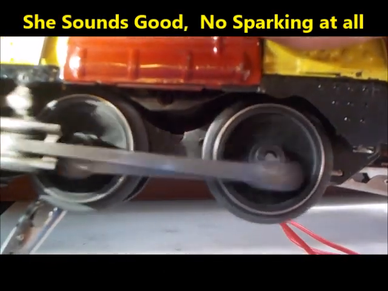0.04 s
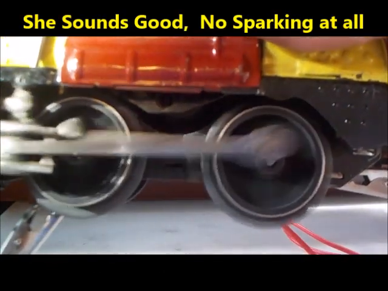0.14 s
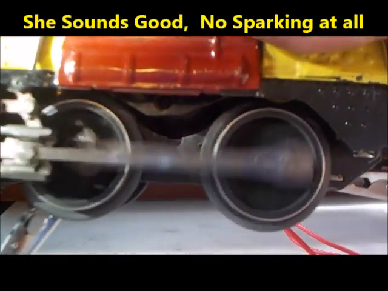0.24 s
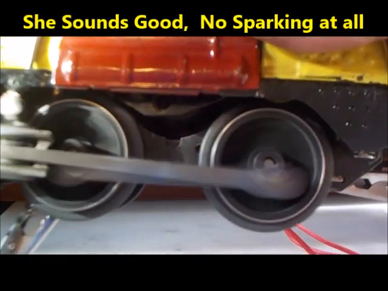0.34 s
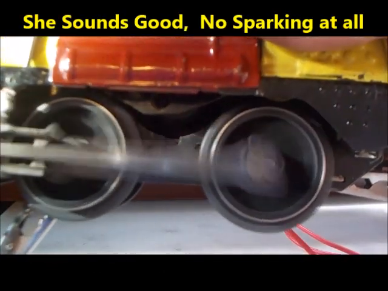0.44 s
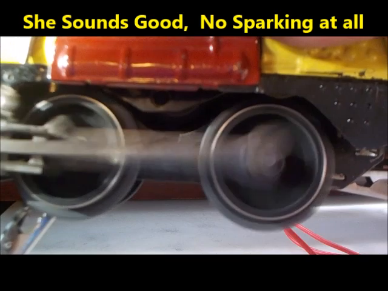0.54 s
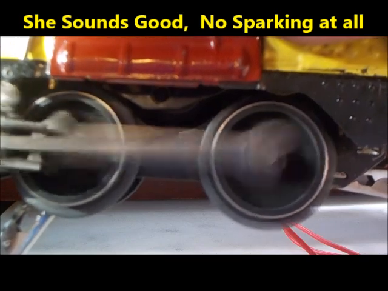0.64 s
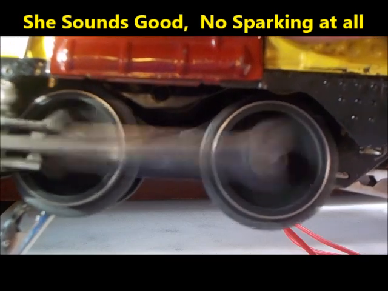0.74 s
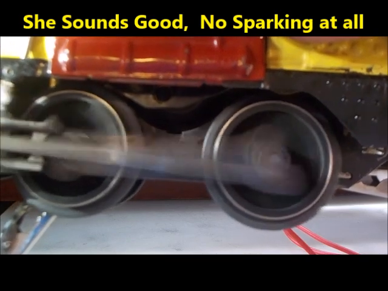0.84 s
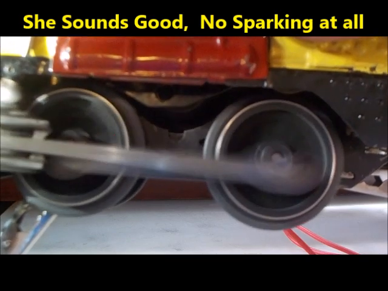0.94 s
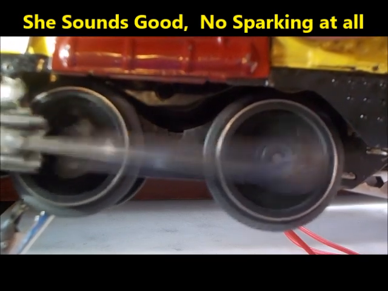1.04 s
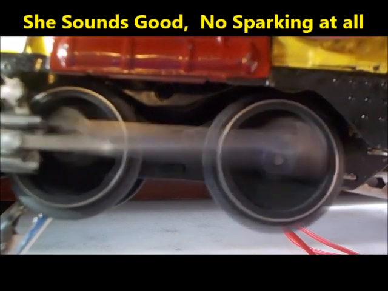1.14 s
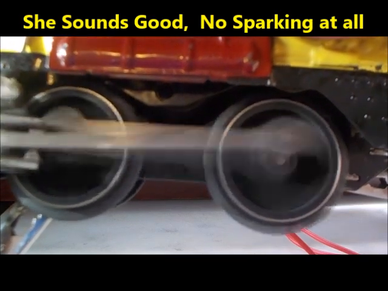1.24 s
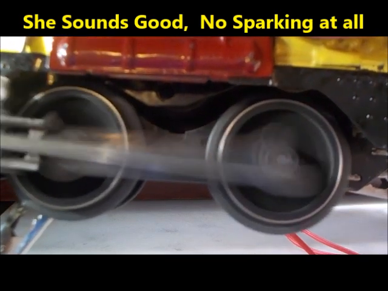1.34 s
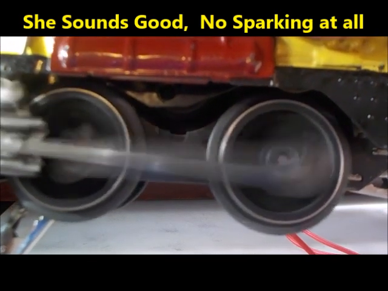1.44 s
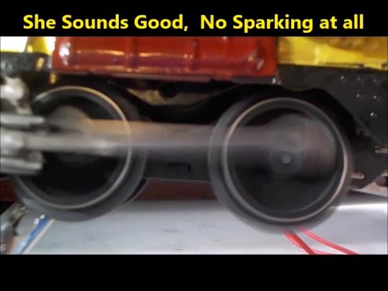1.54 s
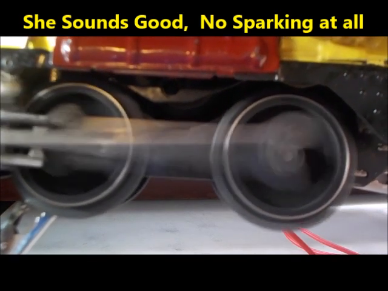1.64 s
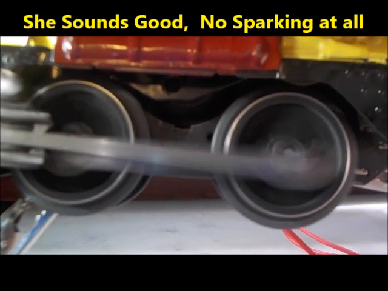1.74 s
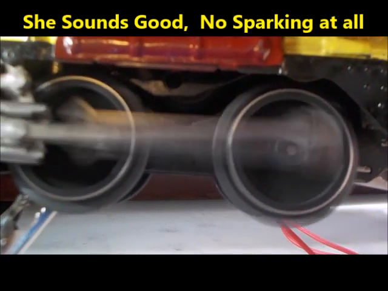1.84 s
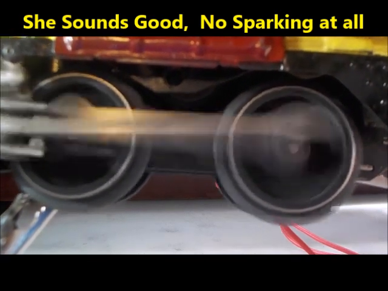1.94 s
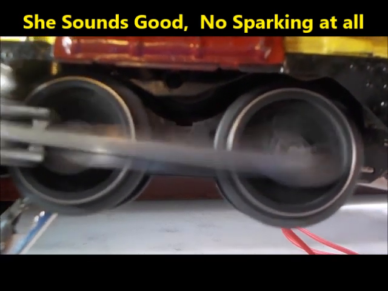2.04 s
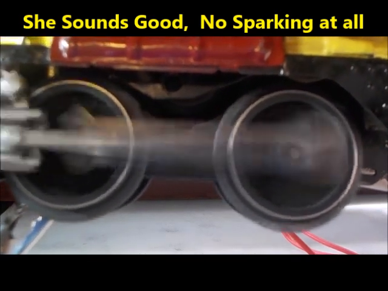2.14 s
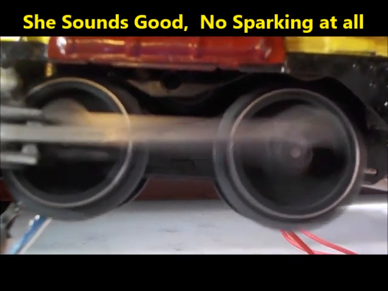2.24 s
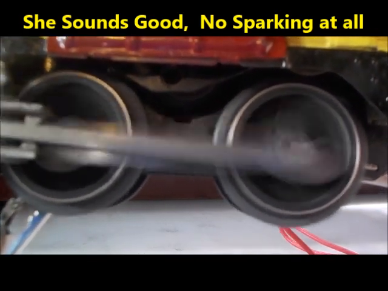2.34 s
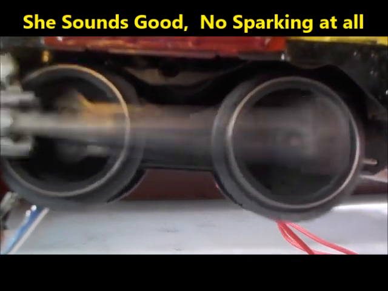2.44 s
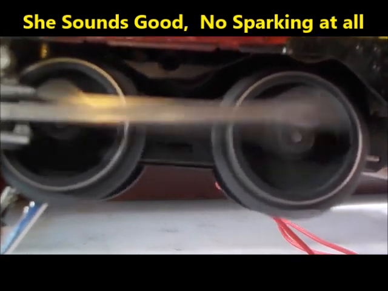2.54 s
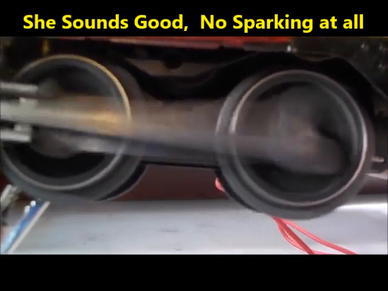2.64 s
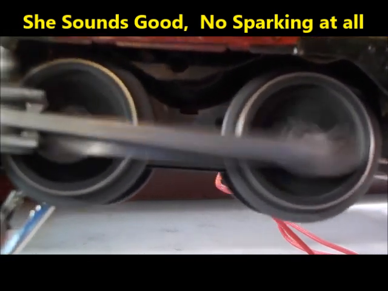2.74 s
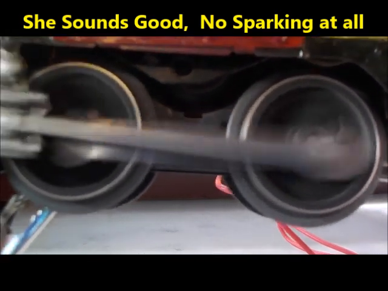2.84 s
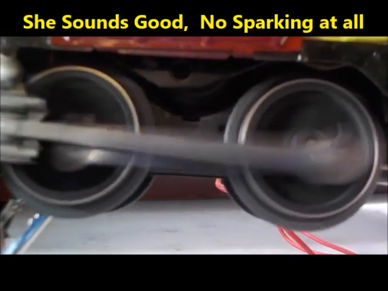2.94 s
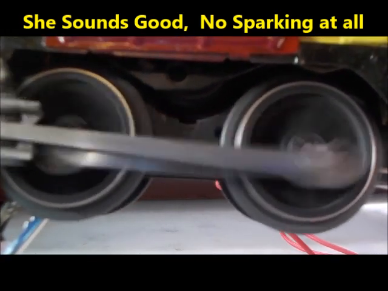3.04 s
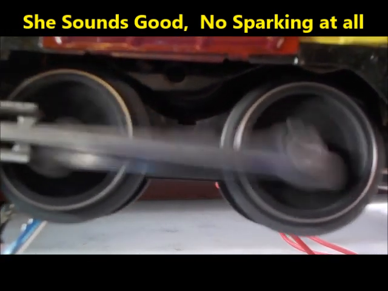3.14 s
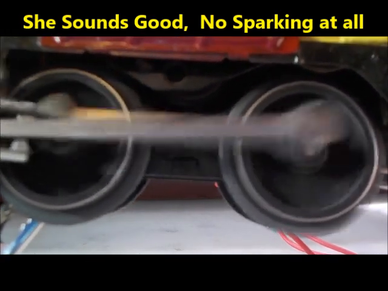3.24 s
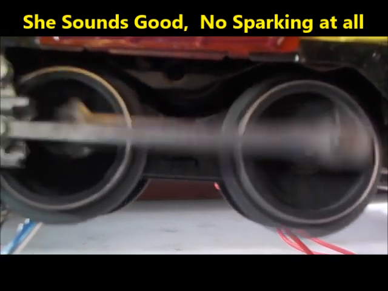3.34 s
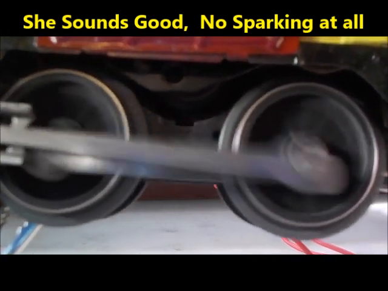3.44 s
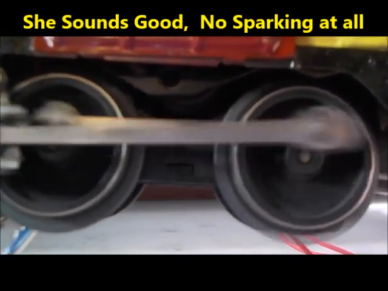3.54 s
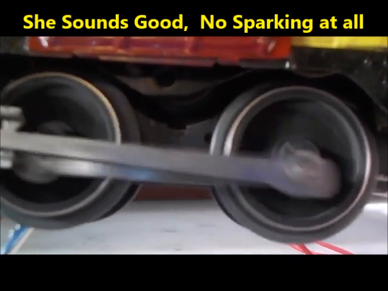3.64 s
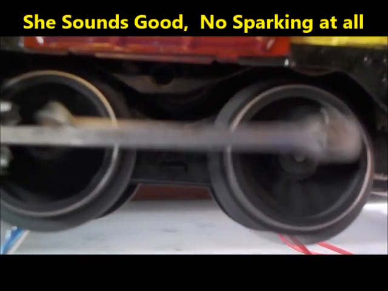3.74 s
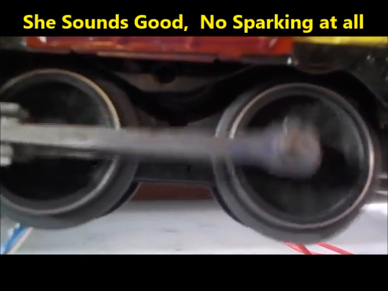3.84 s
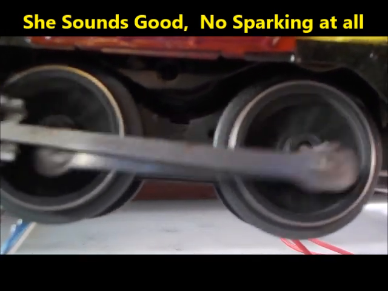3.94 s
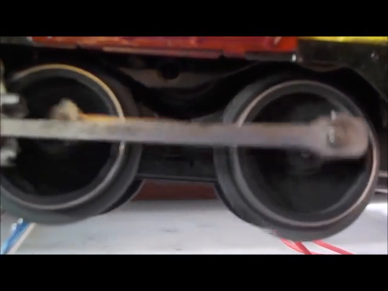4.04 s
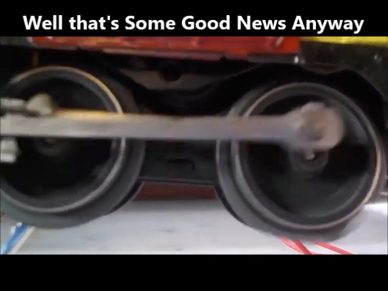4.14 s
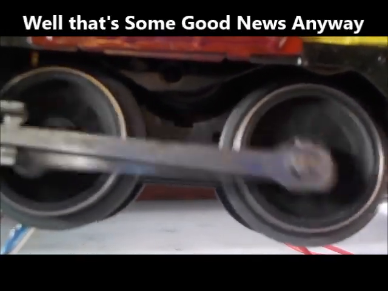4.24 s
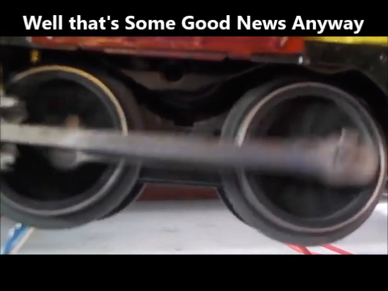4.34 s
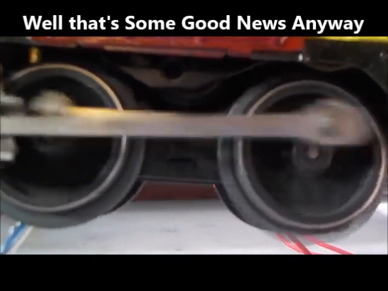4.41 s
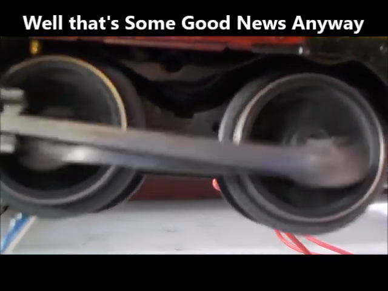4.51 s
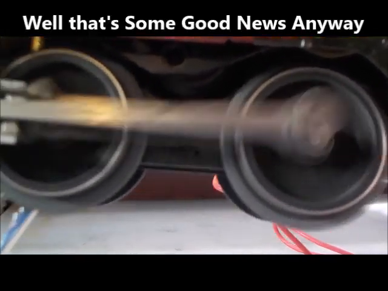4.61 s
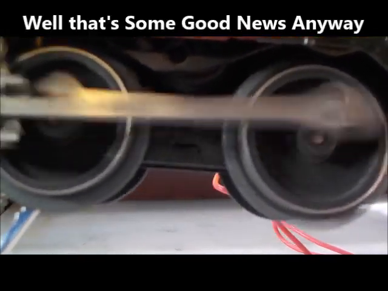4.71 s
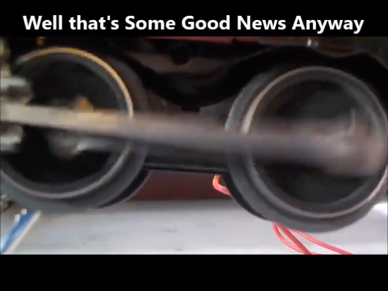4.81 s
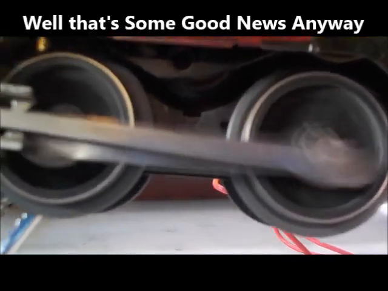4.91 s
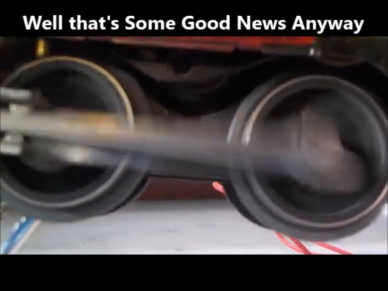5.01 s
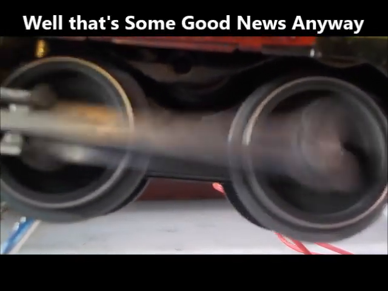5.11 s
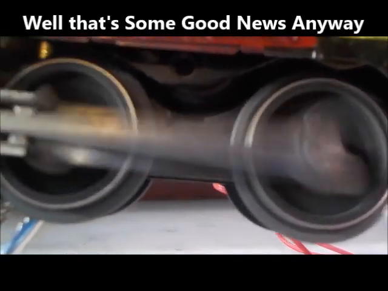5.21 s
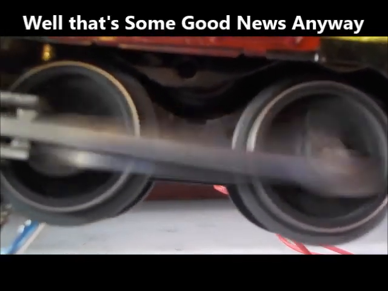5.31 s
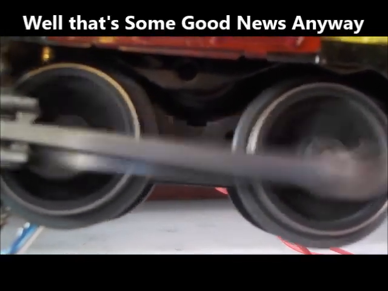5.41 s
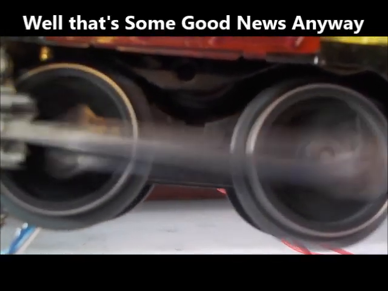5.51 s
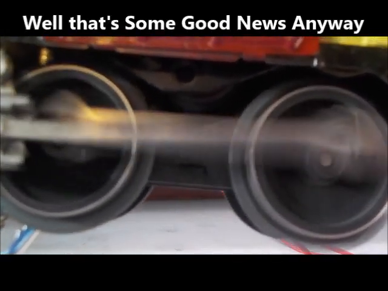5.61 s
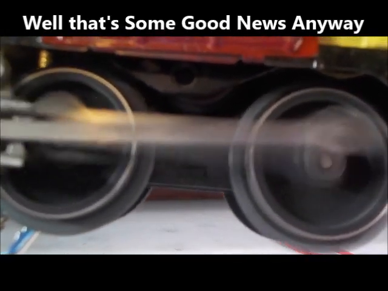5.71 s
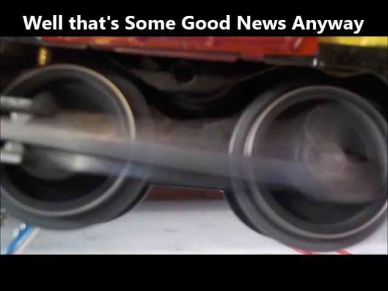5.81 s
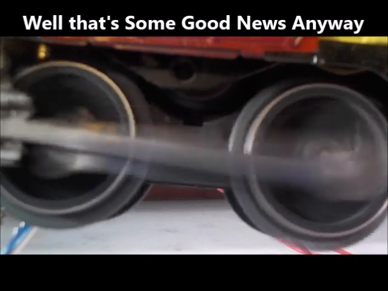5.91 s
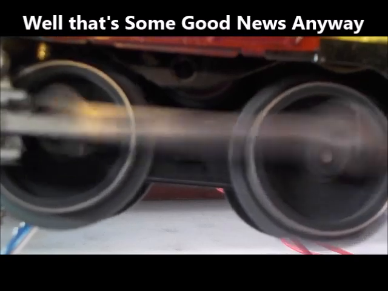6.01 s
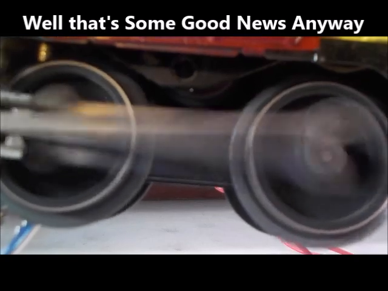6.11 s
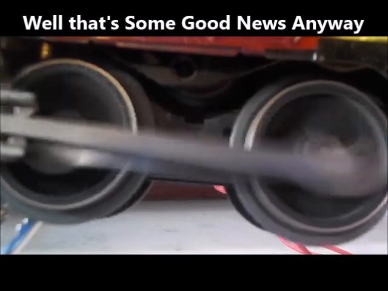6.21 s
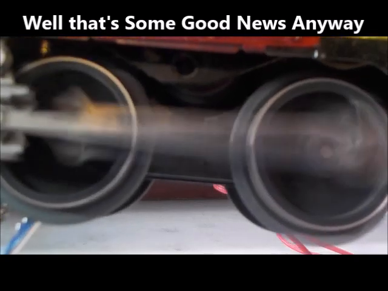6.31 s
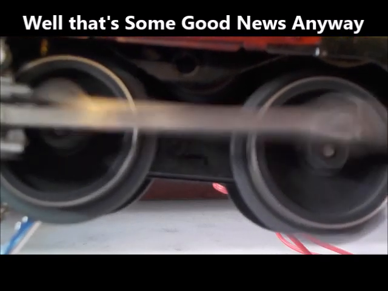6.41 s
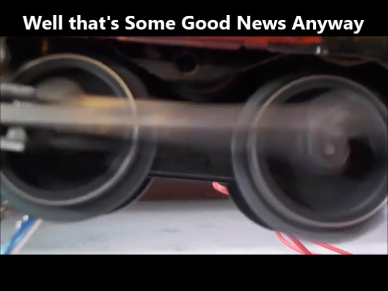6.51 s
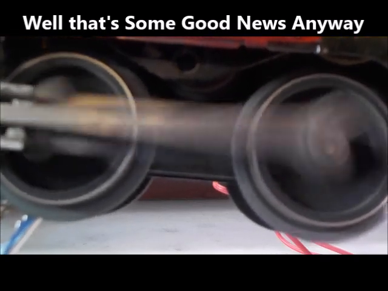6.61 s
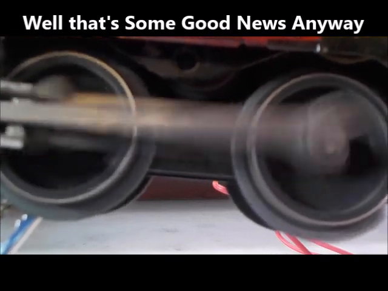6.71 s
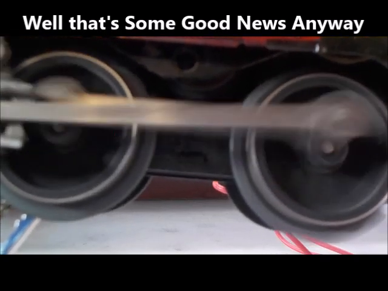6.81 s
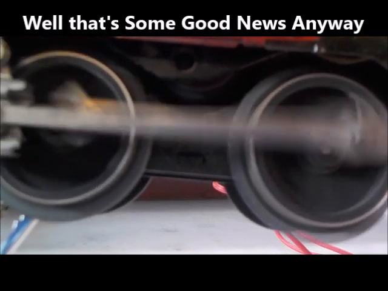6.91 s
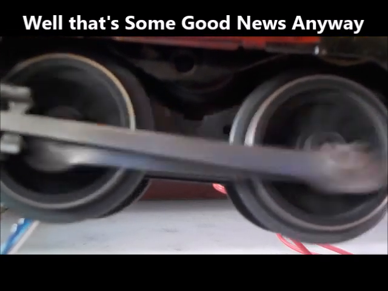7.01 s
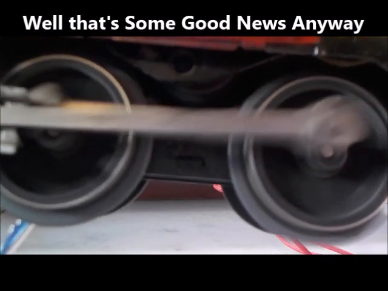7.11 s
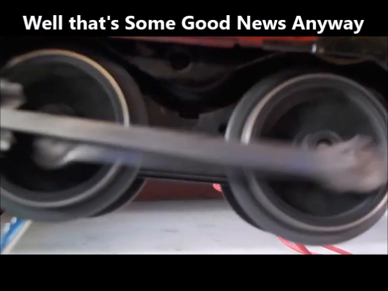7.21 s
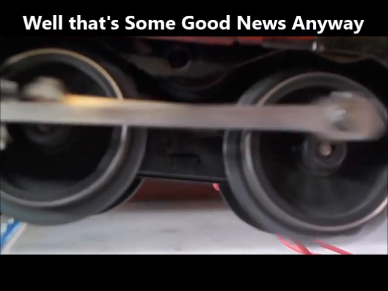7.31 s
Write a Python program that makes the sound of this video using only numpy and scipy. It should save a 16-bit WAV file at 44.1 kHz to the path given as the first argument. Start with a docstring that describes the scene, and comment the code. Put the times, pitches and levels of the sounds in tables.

```python
"""On a workbench, a small electric model locomotive spins its wheels freely, speeding up and easing
off twice. Loose gears chatter in the metal frame and the shell, swelling once per wheel turn as the
coupling rods (the bars linking the wheels) come round. The motor hums faintly underneath, and its small
gear, the pinion, ticks at a crawl. The rods clack at fixed places in each turn and knock near full
speed, and now and then the gears snap over hard."""
import sys
import numpy as np
from scipy import signal
from scipy.fft import rfft, irfft, next_fast_len
from scipy.io import wavfile
from scipy.ndimage import uniform_filter1d

SR = 44100
rng = np.random.default_rng(int(sys.argv[2]) if len(sys.argv) > 2 else 0)


def transcribe(u):
    """Save the signal u as a 16-bit wav file named by the first command-line argument.

    u: samples, shape (n,) or (channels, n), limited to [-1, 1]; the rate is SR.
    q: integer samples, one column per channel.
    """
    v = np.clip(np.atleast_2d(u).T, -1, 1)
    q = np.round(v * 32767).astype(np.int16)
    wavfile.write(sys.argv[1], SR, q)


N = 324568
TIME = np.arange(N) / SR
GEAR_RATIO = 8.53  # motor shaft turns per wheel turn


def from_db(db):
    """Turn decibels into a number to multiply by."""
    return 10 ** (np.asarray(db) / 20)

def at_hz(tone, hz):
    """Read a table of levels at any pitch, on a log-frequency axis."""
    pitch_hz, level_db = np.transpose(tone)
    return np.interp(np.log(np.maximum(hz, 1)), np.log(pitch_hz), level_db)

def response(tone, size=8192):
    """How a body rings after one tap (minimum phase). The table sets its tone, not its loudness."""
    cepstrum = irfft(np.log(from_db(at_hz(tone, np.fft.rfftfreq(size, 1 / SR)))))
    cepstrum[1:size // 2] *= 2
    cepstrum[size // 2 + 1:] = 0
    ring = irfft(np.exp(rfft(cepstrum)))
    return ring / np.linalg.norm(ring)

def through(force, tone):
    """The sound of a force shaking a body."""
    return signal.oaconvolve(force, response(tone)[None], axes=1)[:, :N]

def resonate(force, hz, width_hz):
    """Ring at one pitch; a narrower width rings longer."""
    r = np.exp(-np.pi * width_hz / SR)
    return signal.lfilter([1, 0, -1], [1, -2 * r * np.cos(2 * np.pi * hz / SR), r * r], force)

def steady(x):
    """Even out the power to 1 over about a tenth of a second; the fast grain stays."""
    return x / np.sqrt(np.maximum(uniform_filter1d(x ** 2, 5000), 1e-12))

def scatter(shape):
    """Bell-curve random numbers, kept between -2 and 2."""
    return np.clip(rng.standard_normal(shape), -2, 2)

def wander(per_s):
    """A random curve that drifts about 1 either side of zero."""
    knots = rng.standard_normal(400)
    return np.interp(TIME * per_s, np.arange(len(knots)), knots)

def swell(turns, depth_db, peak_at):
    """The load rises and falls once per wheel turn, highest at the given part of the turn."""
    return from_db(depth_db * np.cos(2 * np.pi * (turns - peak_at)))

def passing(turns, part):
    """The times at which a wheel or shaft passes the given part of its turn."""
    return np.interp(np.arange(int(turns[-1])) + part, turns, TIME)

def blows(events, tone, rise_s, settle_s, size=1200):
    """Each blow (start_s, peak_db) is a brief buzz of rebounds that builds, dies and rings a body."""
    out, body = np.zeros((2, N + 2 * size)), response(tone)[None, :size]
    t = np.arange(size) / SR - .006
    envelope = np.exp(np.minimum(t / rise_s, -t / settle_s))
    for (s, peak_db), buzz in zip(events, rng.standard_normal((len(events), 2, size))):
        ring = signal.fftconvolve(buzz * envelope, body, axes=1)
        ring /= np.abs(ring).max(axis=1, keepdims=True)
        start = max(int((s + t[0] + .0008) * SR), 0)
        out[:, start:start + ring.shape[1]] += from_db(peak_db) * ring
    return out[:, :N]


# How fast the wheels spin: time_s, speed_turns_per_s
WHEEL_SPEED = [(0, 6.23), (.55, 8.62), (1, 11.79), (1.35, 12.6), (1.9, 13.2), (2.5, 13.39), (2.7, 12.14),
               (3.1, 8.5), (3.6, 4.57), (3.9, 3.08), (4.5, 6.45), (5.05, 9.41), (5.5, 11.64), (5.9, 12.79),
               (6.3, 13.03), (6.5, 11.35), (6.85, 8.07), (7.36, 3.81)]
def wheel_motion():
    """Wheel turns so far, speed, and how much the motor pulls or coasts (0 to 1 each)."""
    speed = np.interp(TIME, *np.transpose(WHEEL_SPEED))
    acceleration = uniform_filter1d(np.gradient(speed) * SR, size=10000)
    pull, coast = np.clip(acceleration / 4.5, 0, 1), np.clip(-acceleration / 8, 0, 1)
    return np.cumsum(speed) / SR, speed, pull, coast

def chatter_levels(turns, speed, pull, coast):
    """Base levels of frame and shell: they follow the speed a little late and flatten near the top."""
    lag_turns, press_lag_turns, rattle_turns_per_s = .22, .55, 6.94
    slack = 1 - np.interp(turns - lag_turns, turns, speed) / speed.max()
    # at low speed a pulling motor presses the teeth together and hushes the frame
    pressed = np.interp(turns - press_lag_turns, turns, pull) * np.maximum(rattle_turns_per_s - speed, 0)
    frame_db = -24.5 - 27.5 * slack ** 1.823 - 2.5 * pressed
    shell_db = -40.5 - 29 * slack ** 2.5 - 4 * coast * (1 - slack)  # coasting unloads the shell
    return frame_db, shell_db

def gear_force(shaft_turns, speed, settle_s=.0037):
    """Teeth land unevenly, each setting off tiny dying bounces. Two rows: near side and far side."""
    tooth = np.floor(shaft_turns * 3)
    lands = np.flatnonzero(np.diff(tooth))
    timing, strength = rng.standard_normal((len(lands), 2)).T
    late = (timing * .0006 * SR).astype(int)
    # the pinion runs slightly off centre, so one landing per shaft turn is harder
    hard = tooth[lands] % 3 == 0
    hits = np.zeros(N)
    hits[np.clip(lands + late, 0, N - 1)] = from_db(7.5 * np.clip(strength, -2, 1.3) + 3.5 * hard)
    sliding = 1.0
    pressure = sliding + signal.lfilter([1], [1, -np.exp(-1 / (settle_s * SR))], hits + 1e-18)
    bounces_per_s = 3500 + 450 * speed
    touches = rng.random((2, N)) < bounces_per_s / SR
    sizes = from_db(2.5 * scatter((2, N))) * rng.choice([-1, 1], (2, N))
    return pressure * touches * sizes

def free_flight(clacks, depth_db, gap_s):
    """Just before a clack the parts fly free, so the chatter drops for a moment."""
    free = np.zeros(N)
    for s, _ in clacks:
        near = slice(max(int((s - .03) * SR), 0), int((s + .02) * SR))
        free[near] += np.exp(-((TIME[near] - s) / gap_s + .7) ** 2)
    return from_db(-depth_db * np.minimum(free, 1))


# The dull tone of the chassis, the model's base: pitch_hz, level_db
CHASSIS_TONE = [(80, -55), (140, -27), (250, -14), (400, -2), (520, 1), (750, -7), (1100, -30)]
def chassis_mutter(force):
    """The gears shake the chassis into a faint, even mutter."""
    return from_db(-74) * steady(through(force, CHASSIS_TONE))


# The mid-range tone of the outer shell: pitch_hz, level_db
SHELL_TONE = [(70, -59), (150, -47), (210, -42.5), (300, -36), (450, -14), (640, -4.5), (900, 4),
              (1110, -1.5), (1350, 5), (1620, 0.5), (1820, -4), (2150, -5.5), (2400, -30.5), (3200, -72.5)]
# The narrow rings of the cover: pitch_hz, width_hz, level_db
COVER_RINGS = [(1206, 25, -3), (1469, 47, 10), (1615, 47, 1)]
def shell_chatter(force, turns, slowness, coast, shell_db):
    """The gears shake the shell, which rings the cover; both throb more when slow or coasting."""
    shaking = through(force, SHELL_TONE)
    shell = from_db(shell_db - 2) * steady(shaking)
    shell *= swell(turns, depth_db=.22 * slowness + 1.2 * coast, peak_at=.64)
    rings = sum(from_db(db) * resonate(shaking, hz, width) for hz, width, db in COVER_RINGS)
    cover = from_db(shell_db - 4.5 - 1.5 * slowness + 1.8 * coast) * steady(rings)
    cover *= swell(turns, depth_db=5.2 + .4 * slowness + 3 * coast, peak_at=.66)
    return shell + cover


# The bright tone of the metal frame: pitch_hz, level_db
FRAME_TONE = [(150, -57), (1410, -41.5), (2400, -48.5), (2710, -20.5), (3000, -24.5), (3360, 0), (3590, 2),
              (5140, -6.5), (5880, -5), (6510, -10.5), (7200, -26), (8000, -38), (10400, -61),
              (17600, -120)]
# The narrow rings of the frame: pitch_hz, width_hz, level_db
FRAME_RINGS = [(3504, 21, 2), (3750, 64, 2.5), (4380, 54, -3.5), (5680, 180, -9)]
def frame_chatter(force, turns, slowness, coast, frame_db):
    """The gears rattle the frame; its rings come and go as the contact points shift."""
    rings = sum(from_db(db + 4 * wander(per_s=20)) * steady(resonate(force, hz, width))
                for hz, width, db in FRAME_RINGS)
    # the small frame gives off only its middle range
    rings = signal.sosfilt(signal.butter(8, [3200, 6300], "band", fs=SR, output="sos"), rings)
    rattle = from_db(-1) * steady(through(force, FRAME_TONE))
    metal = rattle + from_db(-10.5 - .5 * slowness) * rings
    return from_db(frame_db) * metal * swell(turns, depth_db=1.06 + .5 * coast, peak_at=.52)


# The high sizzle of metal touching metal: pitch_hz, level_db
SIZZLE_TONE = [(800, -81), (7000, -24.5), (8000, -21), (8450, 4), (9400, 2.5), (10500, -0.5), (11500, -6),
               (13000, -14.5), (16000, -18)]
def sizzle_and_rim(force, turns, slowness, frame_db):
    """The gear contacts sizzle and ring a wheel rim, which pulses strongly once per turn."""
    shaking = through(force, SIZZLE_TONE)
    sizzle = from_db(frame_db - 27 + .037 * slowness) * steady(shaking)
    rim = from_db(frame_db - 41.5 - .19 * slowness) * steady(resonate(shaking, hz=9880, width_hz=90))
    return sizzle * swell(turns, depth_db=1.3, peak_at=.5) + rim * swell(turns, depth_db=12, peak_at=.19)


# The tones in the hum: cycles_per_shaft_turn, level_db, fade_db (per turn a second below top speed)
HUM_TONES = [(3, -12, -.2), (4, -21, 1.2), (6, -14, 1.6), (9, -20, 1.5)]
def motor_hum(turns, speed, coast, shell_db):
    """The motor's spinning core hums through the shell, clearest at speed and weaker when coasting."""
    hum, slowness = 0, speed.max() - speed
    for multiple, db, fade_db in HUM_TONES:
        per_turn = multiple * GEAR_RATIO
        tone_db = db - fade_db * slowness + at_hz(SHELL_TONE, per_turn * speed)
        hum = hum + from_db(tone_db) * np.sin(2 * np.pi * per_turn * turns)
    near_side_only = np.array([[1], [0]])
    return np.sqrt(2) * hum * from_db(shell_db - 6 * coast + 2 * wander(per_s=12)) * near_side_only


# The tone of the background hiss: pitch_hz, level_db
HISS_TONE = [(20, -7), (42, -8), (62, -26), (110, -18), (200, -13), (600, -8), (2400, -14), (6000, 0),
             (16000, 4)]
def background_hiss():
    """A very soft, steady microphone hiss with a trace of low room rumble."""
    return from_db(-70) * through(rng.standard_normal((2, N)), HISS_TONE)

def pinion_ticks(turns, speed, frame_db):
    """One sharp tick per shaft turn: clear at a crawl, fading out as the wheels speed up."""
    start_s = passing(turns * GEAR_RATIO, 0)
    start_s = start_s[np.interp(start_s, TIME, speed) < 9]
    peak_db = np.interp(start_s, TIME, frame_db - 1.6 * speed) + 17.5 + 3.6 * scatter(len(start_s))
    ticks = np.column_stack([start_s, peak_db])
    frame = blows(ticks, FRAME_TONE, rise_s=.00069, settle_s=.0011)
    return frame + from_db(-26) * blows(ticks, SIZZLE_TONE, rise_s=.00037, settle_s=.0009)


# Where the loose rods catch in each wheel turn: position_turns, boost_db
ROD_CATCHES = [(.26, 12), (.51, 12), (.74, 12)]
def plan_rod_clacks(turns, speed, frame_db, scatter_turns=.02, spread_db=1.3):
    """List (start_s, level_db): the rods catch three times a turn, silently if a gear snap is near."""
    clacks, snap_s = [], np.array(GEAR_SNAPS)[:, 0]
    for position, boost_db in ROD_CATCHES:
        start_s = passing(turns, position)
        late, strength = scatter((len(start_s), 2)).T
        late_s = late * scatter_turns / np.interp(start_s, TIME, speed)
        start_s = np.clip(start_s + late_s, 0, TIME[-1])
        level_db = np.interp(start_s, TIME, frame_db) + boost_db + spread_db * strength
        clear = np.abs(start_s[:, None] - snap_s).min(axis=1) > .022
        clacks += zip(start_s, np.where(clear, level_db, -np.inf))
    return clacks

def plan_rod_taps(turns, speed, spread_db=3):
    """List (start_s, level_db): the rods tap their stops once a turn, loudest near full speed."""
    start_s = passing(turns, .5)
    slowness = speed.max() - np.interp(start_s, TIME, speed)
    return list(zip(start_s, -38 - 3 * slowness + spread_db * scatter(len(start_s))))


# The loose gears snapping over hard: start_s, level_db
GEAR_SNAPS = [(0.0972, -15), (0.6285, -12), (0.8734, -9), (0.9747, -9), (1.3947, -8), (1.6257, -8),
              (1.9315, -9), (2.8509, -12), (3.1627, -15), (3.1991, -13), (3.8048, -20), (5.1407, -10),
              (5.4375, -8), (5.8456, -6), (5.9833, -10), (6.3834, -8), (6.4807, -10), (6.5545, -12),
              (6.5824, -6), (6.6643, -8), (6.7585, -12), (6.7855, -11), (6.8833, -14), (7.012, -9)]
def snaps_and_clacks(clacks):
    """Gear snaps and rod clacks strike the frame, with a little shell ring and sizzle."""
    both = list(GEAR_SNAPS) + clacks
    gears = from_db(-1) * blows(GEAR_SNAPS, FRAME_TONE, rise_s=.0013, settle_s=.0021)
    rods = from_db(-1.5) * blows(clacks, FRAME_TONE, rise_s=.0011, settle_s=.0022)
    shell = from_db(-27.5) * blows(both, SHELL_TONE, rise_s=.0018, settle_s=.007)
    sizzle = from_db(-28.5) * blows(both, SIZZLE_TONE, rise_s=.0018, settle_s=.0036)
    return gears + rods + shell + sizzle


# Hard rod knocks, mostly near full speed, before their boosts below: start_s, knock_db, jolt_db
ROD_KNOCKS = [(0.8734, -34, -93), (1.2855, -22, -72), (1.4696, -30, -74), (1.5359, -29, -79),
              (1.6916, -32, -80), (2.159, -31, -73), (2.3092, -24, -76), (2.6115, -31, -73),
              (2.7766, -31, -87), (5.6067, -33, -81), (5.7813, -32, -78), (5.8456, -21, -78),
              (5.9369, -26, -83), (6.1739, -28, -70), (6.3275, -29, -71), (6.7855, -35, -79)]
# The bright tone of a knock: pitch_hz, level_db
KNOCK_TONE = [(2500, -62), (3500, 13), (6200, 12), (8000, -9), (10000, -4), (12500, 3), (16000, -1.5)]
# The dull tone of a jolt: pitch_hz, level_db
JOLT_TONE = [(30, -22), (75, -28), (150, -10), (250, 4), (450, 15), (800, -10), (1600, -54)]
def rod_knocks(taps):
    """Rod taps and knocks click brightly; the knocks also jolt the chassis."""
    knocks = [(s, db) for s, db, _ in ROD_KNOCKS]
    jolts = [(s, db) for s, _, db in ROD_KNOCKS]
    clicks = from_db(9.5) * blows(knocks + taps, KNOCK_TONE, rise_s=.0005, settle_s=.00046)
    return clicks + from_db(22) * blows(jolts, JOLT_TONE, rise_s=.002, settle_s=.005)

def low_cut(x, cutoff_hz):
    """Cut the low rumble from the engine sound."""
    return signal.sosfilt(signal.butter(6, cutoff_hz, "high", fs=SR, output="sos"), x)


# How much far-side sound is mixed in, making left and right differ: pitch_hz, level_db
FAR_SIDE_SHARE = [(60, -12), (200, -5), (350, -5), (700, -11.5), (1500, -15.5), (3500, -10.5), (6500, -16),
                  (9000, -0.5), (15000, -27)]
# How much louder the left is than the right: pitch_hz, difference_db
LEFT_RIGHT_BALANCE = [(100, 4), (380, -2), (700, -4.5), (1300, -2), (2400, -2.5), (3500, 0.5), (5000, 0),
                      (9000, 2.5), (15000, 0)]
def stereo(x, left_lead_s):
    """The near side reaches both channels, the left a little sooner; the far side makes them differ."""
    size = next_fast_len(N + 4096)
    hz, sides = np.fft.rfftfreq(size, 1 / SR), np.array([[1], [-1]])
    near, far = rfft(x, size)
    channels = near + sides * from_db(at_hz(FAR_SIDE_SHARE, hz)) * far
    channels *= from_db(sides * at_hz(LEFT_RIGHT_BALANCE, hz) / 2)
    return irfft(channels * np.exp(1j * np.pi * hz * sides * left_lead_s), size)[:, :N]

def wall_echo(x, fade_s, size=16384):
    """The workshop walls add a short tail that falls 60 dB in fade_s."""
    t = np.arange(size) / SR
    tail = rng.standard_normal((2, size)) * from_db(-60 * t / fade_s) * (t > .004)
    return signal.oaconvolve(x, tail / np.linalg.norm(tail[0]), axes=1)[:, :N]

def scene():
    """The locomotive close by, over a faint hiss; one gear force drives all of its chatter."""
    turns, speed, pull, coast = wheel_motion()
    slowness = speed.max() - speed
    frame_db, shell_db = chatter_levels(turns, speed, pull, coast)
    clacks = plan_rod_clacks(turns, speed, frame_db)
    force = gear_force(turns * GEAR_RATIO, speed)
    force *= free_flight(clacks, depth_db=2, gap_s=.004) * free_flight(GEAR_SNAPS, depth_db=4, gap_s=.005)
    chatter = (chassis_mutter(force)
               + shell_chatter(force, turns, slowness, coast, shell_db)
               + frame_chatter(force, turns, slowness, coast, frame_db)
               + sizzle_and_rim(force, turns, slowness, frame_db))
    taps = plan_rod_taps(turns, speed)
    impacts = snaps_and_clacks(clacks) + rod_knocks(taps) + pinion_ticks(turns, speed, frame_db)
    engine = chatter + impacts + motor_hum(turns, speed, coast, shell_db)
    direct = stereo(low_cut(engine, cutoff_hz=116) + background_hiss(), left_lead_s=.000018)
    return direct + from_db(-18) * wall_echo(direct, fade_s=.2)

def record(dry):
    """Cut the very highest treble steeply."""
    cutoff_hz = 15800
    return signal.sosfilt(signal.ellip(12, .1, 80, cutoff_hz, fs=SR, output="sos"), dry)


dry = scene()
out = record(dry)
transcribe(out)
```